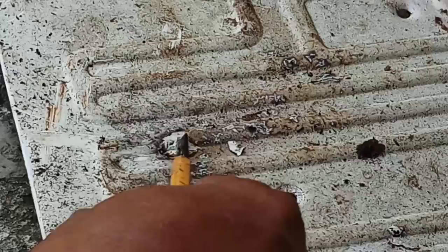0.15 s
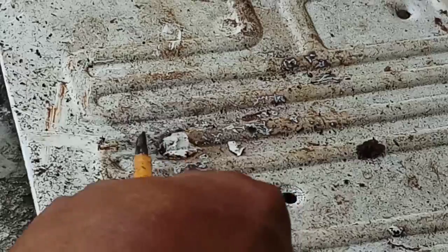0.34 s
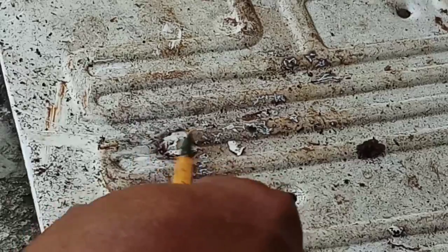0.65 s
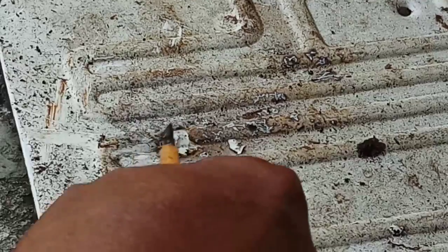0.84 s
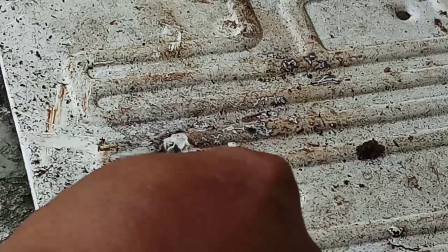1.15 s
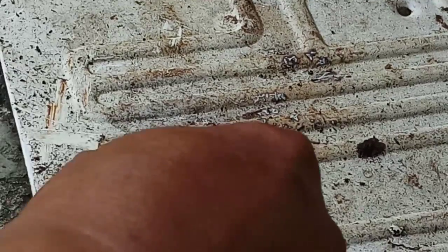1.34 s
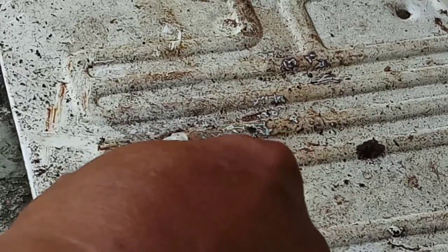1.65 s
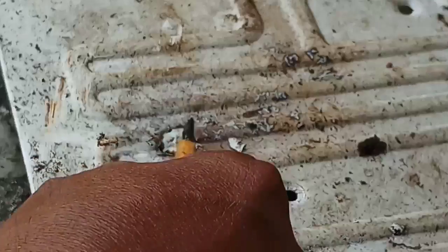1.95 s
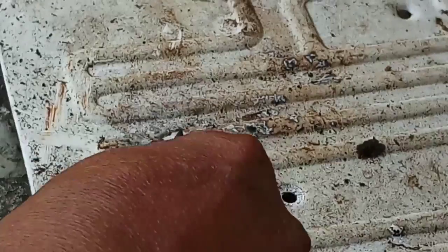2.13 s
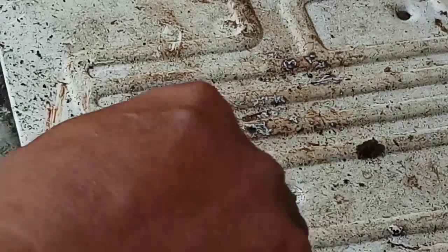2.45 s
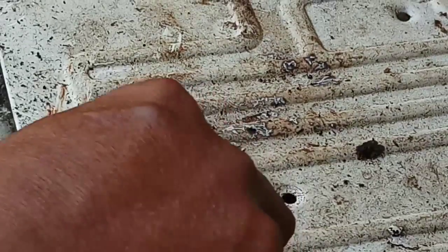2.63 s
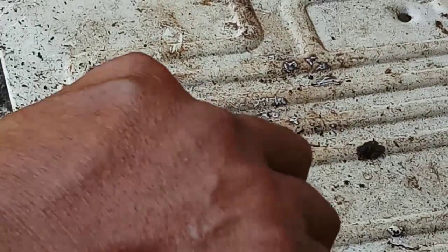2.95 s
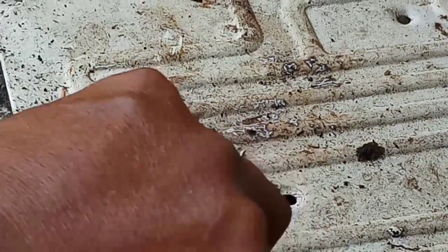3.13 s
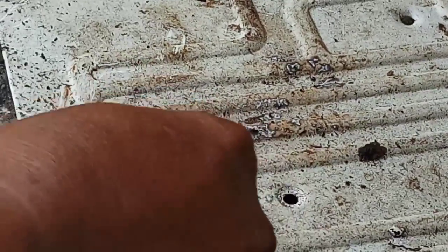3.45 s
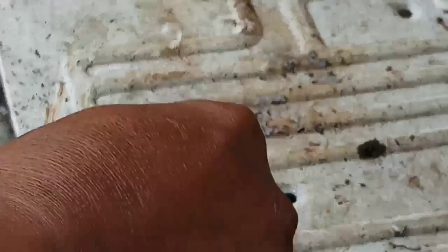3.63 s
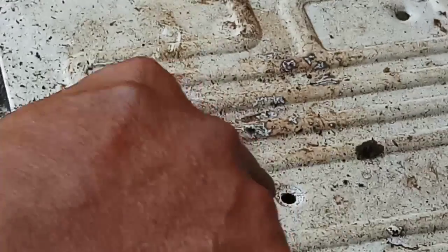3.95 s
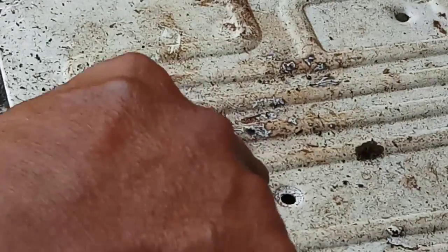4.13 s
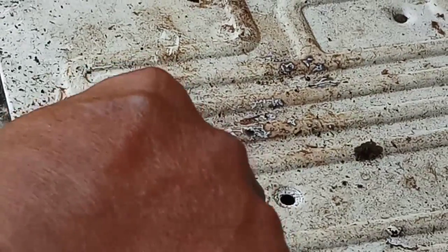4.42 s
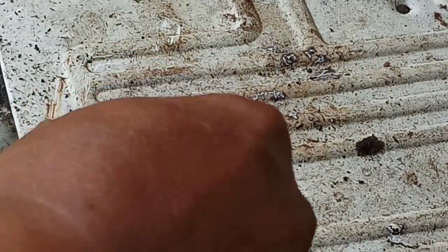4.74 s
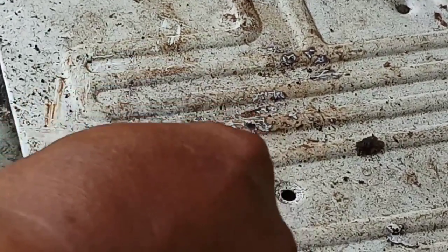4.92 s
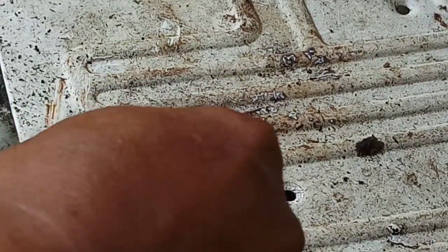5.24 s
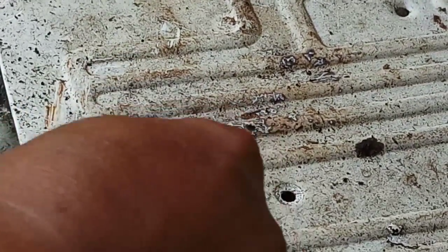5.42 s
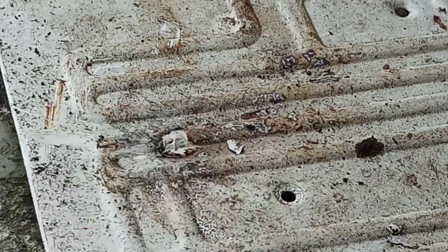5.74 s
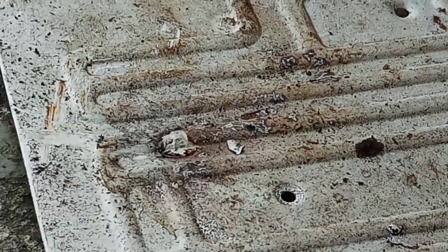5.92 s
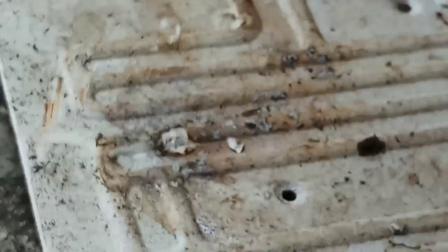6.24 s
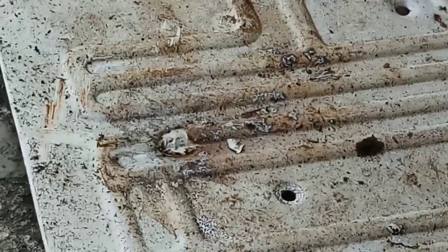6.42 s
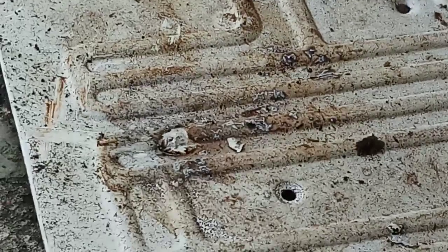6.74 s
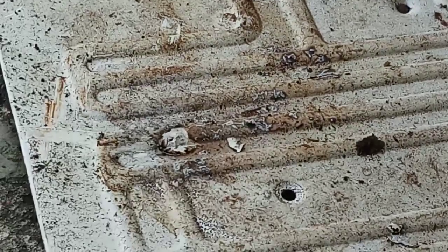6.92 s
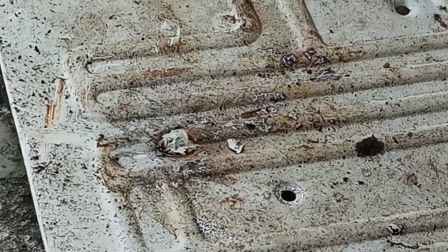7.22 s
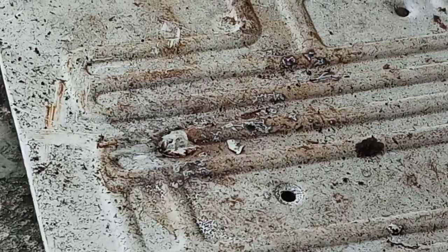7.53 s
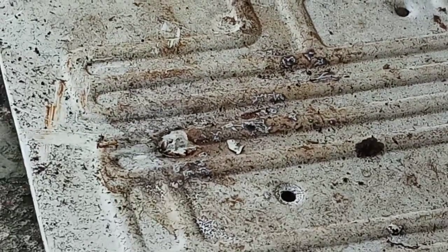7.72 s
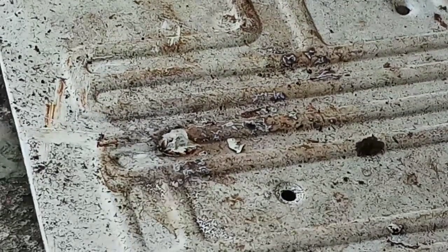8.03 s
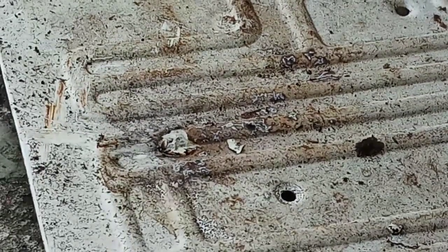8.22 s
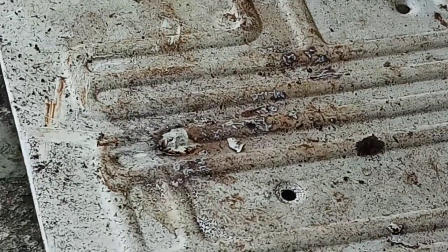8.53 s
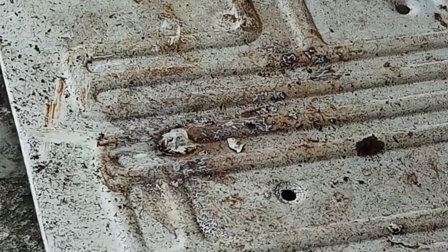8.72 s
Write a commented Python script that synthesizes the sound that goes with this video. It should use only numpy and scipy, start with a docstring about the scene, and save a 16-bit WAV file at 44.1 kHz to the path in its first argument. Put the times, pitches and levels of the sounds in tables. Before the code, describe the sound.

Crickets trill steadily at one pitch outdoors while a tool faintly ticks and scratches on a painted metal panel.

```python
"""From the start, crickets in a yard rub their wings, and echoes blur the trills into one note near 2.3 kHz.
Thin insects sing far off, over a low outdoor rumble, mains hum and a faint electrical buzz.
Close by, an arm rustles on and off, and for the first three seconds a tool ticks on a painted metal panel.
After four seconds a far insect chirps twice, with a high rasp. Then the tool scratches faintly
at the paint until about 7.5 s, with one dull knock near 5 s, and the crickets sing on to the end."""
import sys
import numpy as np
from scipy import signal
from scipy.fft import rfft, irfft, next_fast_len
from scipy.io import wavfile

SR = 44100
rng = np.random.default_rng(int(sys.argv[2]) if len(sys.argv) > 2 else 0)


def file_out(sig):
    """Save sig as 16-bit WAV at sys.argv[1]."""
    # one column per channel
    cols = np.atleast_2d(sig).T
    # limit, then scale
    lim = np.clip(cols, -1, 1)
    pcm = np.round(lim * 32767).astype(np.int16)
    wavfile.write(sys.argv[1], SR, pcm)


N = 391166
T = np.arange(N) / SR


def undb(db):
    """Turn decibels into a number to multiply by."""
    return 10 ** (np.asarray(db) / 20)


def level(x, db):
    """Set a sound's average (rms) level."""
    return x * undb(db) / np.sqrt(np.mean(x ** 2))


def colour(x, points):
    """Turn lows and highs up or down along a curve of (pitch [Hz], gain [dB]) points."""
    hz, db = np.transpose(points)
    bins = np.fft.rfftfreq(len(x), 1 / SR)
    gain = undb(np.interp(np.log(bins + 1), np.log(hz), db))
    return irfft(rfft(x) * gain, len(x))


def tilted(points, slope, pivot_hz):
    """Make a colour curve brighter by `slope` dB an octave."""
    return [(hz, db + slope * np.log2(hz / pivot_hz)) for hz, db in points]


def band(x, hz, width_hz):
    """Keep only the sound near one pitch."""
    edges = np.clip([hz - width_hz / 2, hz + width_hz / 2], 10, SR / 2 - 10)
    return signal.sosfilt(signal.butter(N=2, Wn=edges, btype="band", fs=SR, output="sos"), x)


def noise():
    """An even hiss: white noise."""
    return rng.standard_normal(N)


def wander(rate):
    """A smooth random curve of size about 1 that turns about `rate` times a second."""
    size = next_fast_len(N, real=True)
    hz = np.fft.rfftfreq(size, 1 / SR)
    slow_part = rfft(noise(), size) * np.exp(-(hz / rate) ** 2)
    return level(irfft(slow_part, size)[:N], 0)


def arch(u):
    """Rise and fall once while u runs from 0 to 1; silent outside."""
    return np.sin(np.pi * np.clip(u, 0, 1))


def add(track, start, sound):
    """Mix a short sound into the track, `start` seconds in."""
    place = track[max(int(start * SR), 0):][:len(sound)]
    place += sound[:len(place)]


def yard(x, fade_s, echo_db):
    """Walls and plants send back a dense echo that falls 60 dB in `fade_s`."""
    tail = noise()[:SR] * undb(-60 * T[:SR] / fade_s)
    return x + undb(echo_db) * signal.fftconvolve(x, tail / np.linalg.norm(tail))[:N]


# the colour of outdoor air: (pitch [Hz], gain [dB])
AIR_COLOUR = [(20, -5.5), (40, -0.5), (110, 1.5), (200, -3.5), (400, -9.5), (600, -14), (950, -15.5),
              (1300, -20.5), (2000, -11.5), (3400, -12), (4800, -14), (6000, -20), (7800, -23),
              (15500, -28)]

def air(air_db=-62.5):
    """Outdoor hiss and rumble, with a low murmur that swells slowly like far traffic."""
    murmur = level(band(noise(), hz=349, width_hz=215), db=-82) * undb(2 * wander(1.5))
    rumble = level(colour(noise(), AIR_COLOUR), air_db) * undb(.33 * wander(3.4))
    return rumble + murmur


def electrics(hum_db=-72, buzz_db=-74, repeats_per_s=22.693):
    """Mains hum, and a buzz made of three short pips that repeat quickly."""
    slot = (repeats_per_s * T - .235) % 1 * 12
    pips = (slot < 3) * arch(slot % 1) ** 2  # only 3 of the 12 time slots sound
    whine_phase = 2 * np.pi * np.cumsum(3630 + 45 * wander(144)) / SR
    harmonics_db = [6, -5, -4.5, -4]
    whine = sum(undb(db) * np.sin(k * whine_phase) for k, db in enumerate(harmonics_db, 1))
    hum = np.sin(2 * np.pi * 49.4 * T + .5 * wander(3.5))
    return level(pips * whine, buzz_db) + level(hum, hum_db)


# far insect songs: (pitch [Hz], width [Hz], level [dB], throb rate [per s], throb depth [0-1])
FAR_SONGS = [(4494, 57, -77.5, 4.0, 0.17), (6920, 460, -77.5, 1.0, 0), (8820, 460, -79, 2.6, 0.03)]

def far_insects():
    """Thin songs, smeared by distance into narrow bands of hiss; some throb."""
    out = 0
    for hz, width, db, rate, depth in FAR_SONGS:
        throb = 1 + depth * np.sin(2 * np.pi * rate * T + .5 * wander(1))
        out += level(band(noise(), hz, width) * throb, db)
    return out


# how loud the pulsing insect is as time passes: (time [s], level [dB])
PULSING_LEVELS = [(0, -77.5), (3.3, -76.5), (3.8, -90), (6.4, -93), (7.6, -81.5), (8.87, -83)]

def pulsing_insect(pulses_per_s=6.7):
    """One very high insect pulses, fades away and comes back."""
    pulses = arch((pulses_per_s * T - .25) % 1)
    song = level(band(noise(), hz=8430, width_hz=230) * pulses, 0)
    return song * undb(np.interp(T, *np.transpose(PULSING_LEVELS)))


# two chirps: (middle time [s], level [dB])
CHIRP_PEAKS = [(4.29, -62.3), (4.522, -61.4)]

def chirping_insect(length_s=.155):
    """A far insect chirps twice, and each chirp trails off in the yard."""
    swell = sum(undb(db) * arch((T - middle) / length_s + .5) for middle, db in CHIRP_PEAKS)
    chirps = swell * level(band(noise(), hz=4915, width_hz=510), 0)
    return yard(chirps, fade_s=.5, echo_db=-1.5)


# the two strokes of a rasp: (time [s], level [dB])
RASP_STROKES = [(4.435, -64), (4.482, -58.5)]
# the colour of the rasp: (pitch [Hz], gain [dB])
RASP_COLOUR = [(7000, -35), (7800, -10), (9500, -11), (10400, 0), (11000, -9), (12000, -30)]

def rasp(length_s=.048):
    """A dry, thin double rasp overlaps the second chirp."""
    strokes = sum(undb(db) * arch((T - start) / length_s) for start, db in RASP_STROKES)
    return strokes * level(colour(noise(), RASP_COLOUR), 0)


# strokes of skin over paint: (time [s], length [s], level [dB])
SKIN_STROKES = [(2.36, .22, -71.5), (2.66, .15, -72.5), (6.78, 1, -71.5)]

def skin_swishes():
    """Skin brushes the paint with a soft, high hiss."""
    strokes = sum(undb(db) * arch((T - start) / length) for start, length, db in SKIN_STROKES)
    return strokes * level(band(noise(), hz=5200, width_hz=3600), 0)


# sweeps of the hand and arm: (time [s], length [s], level [dB])
ARM_SWEEPS = [(.37, .47, -60.5), (.72, .52, -63.5), (2.88, .34, -67), (3.67, .4, -65.3), (5.279, .25, -63),
              (5.597, .3, -66.5), (6.32, .22, -64.5)]
# the colour of a rustle: (pitch [Hz], gain [dB])
RUSTLE_COLOUR = [(30, -5), (70, -4), (150, 2.5), (260, -2.5), (390, 1.5), (600, -6), (1000, -8.5),
                 (1500, -21), (3000, -13), (6000, -14.5), (9000, -28), (15000, -42)]

def arm_rustles(plain_db=-61, brightening=.38):
    """The arm rustles over the panel; a brisker sweep is brighter as well as louder."""
    out = np.zeros(N)
    for start, length, db in ARM_SWEEPS:
        slope = brightening * (db - plain_db)
        rub = colour(rng.standard_normal(SR), tilted(RUSTLE_COLOUR, slope, pivot_hz=1000))
        add(out, start, level(rub, db) * arch(T[:SR] / length))
    return out


# soft bumps: (time [s], pitch [Hz], level [dB])
HAND_BUMPS = [(.59, 54.4, -51), (.615, 150, -55), (.832, 70, -51), (4.238, 125, -50)]

def hand_bumps(length_s=.03):
    """The hand holding the microphone jogs it now and then, making a low thud."""
    out, age = np.zeros(N), T[:SR]
    for start, hz, db in HAND_BUMPS:
        add(out, start, undb(db) * np.sin(2 * np.pi * hz * age) * arch(age / length_s) ** 2)
    return out


# light taps of the tool: (time [s], strength [dB], brightness [dB per octave])
TOOL_TAPS = [(.729, -56, -8), (.863, -55, -6), (.970, -59, 10), (1.332, -58, 10), (2.750, -58, 3),
             (3.173, -48.3, -.5)]
# the colour of a tap: (pitch [Hz], gain [dB])
TAP_COLOUR = [(1000, -20), (3000, -10), (4500, 12), (7000, 3), (9000, 2), (12000, -5), (15500, -11)]

def tool_taps(crack_s=.0015, ring_s=.022, ring_db=-16):
    """The tool tip touches the metal: a short crack and a faint ring that dies quickly."""
    out, age = np.zeros(N), T[:SR]
    strike = np.exp(-age / crack_s) + undb(ring_db) * np.exp(-age / ring_s)
    for start, db, slope in TOOL_TAPS:
        hiss = colour(rng.standard_normal(SR), tilted(TAP_COLOUR, slope, pivot_hz=6400))
        add(out, start, undb(db) * strike * hiss)
    return out


def press(length, bite_s=.004, lift_s=.01):
    """How hard the tip presses in one scratch or knock: it bites, holds and lifts."""
    age = T[:SR]
    return np.minimum(age / bite_s, 1) * np.clip((length - age) / lift_s + .5, 0, 1)


# scratches and one short, dull knock (at 5.029 s) of the tool on the panel:
# (time [s], length [s], strength [dB], brightness [dB per octave])
SCRATCHES_AND_KNOCK = [(.104, .03, -63.5, 5), (4.487, .03, -62, 5), (4.625, .06, -62.5, .5),
                       (4.758, .055, -60, 1), (4.975, .019, -60.5, 4), (5.029, .009, -68.5, -9),
                       (5.456, .041, -54, .5), (6.07, .032, -62, -1), (6.70, .05, -65.5, 4),
                       (7.228, .12, -67.5, -3), (7.477, .011, -57, -1.5)]
# the notes the panel rings at: (pitch [Hz], width [Hz], gain [dB])
PANEL_NOTES = [(630, 370, -4.5), (1074, 210, -1), (1460, 240, -1), (3050, 520, 3.5), (3430, 440, 1.5),
               (4300, 450, -2), (7000, 3200, -4.5)]

def scratches_and_knock(catches_per_s=4000, uneven_db=5, slips_per_s=140, slip_db=2.5):
    """The tip catches on the paint or knocks, ringing the panel; a sharper edge sounds brighter."""
    catches = noise() * (rng.random(N) < catches_per_s / SR)
    grip = undb(uneven_db * noise() + slip_db * wander(slips_per_s))  # the tip sticks and slips
    grit = level(catches * grip, 0)
    panel = 0
    for hz, width, note_db in PANEL_NOTES:
        pressure = np.zeros(N)
        for start, length, db, slope in SCRATCHES_AND_KNOCK:
            add(pressure, start, undb(db + slope * np.log2(hz / 2500)) * press(length))
        ring = band(grit * pressure + 1e-18, hz, width)
        panel += undb(note_db) * ring * np.sqrt(SR / 10 / width)  # evens out wide and narrow notes
    return yard(panel, fade_s=.15, echo_db=-9)


def trill(hz, rate, roughness, duty=.892, sag_hz=60, waver_hz=4, uneven_db=.66, unsteady=.065):
    """One cricket: each closing wing stroke rings a tiny note whose pitch sags as the wing slows."""
    strokes = rate * T + rng.random() + unsteady * wander(9)
    progress = strokes % 1 / duty  # duty is the share of each stroke that sounds
    loudness_luck, phase_luck = rng.standard_normal((4096, 2))[strokes.astype(int)].T
    wing_phase = 2 * np.pi * np.cumsum(hz + waver_hz * wander(6.003)) / SR
    sag = np.pi * sag_hz * duty / rate * progress * (1 - progress)
    loudness = arch(progress) ** 1.21 * undb(uneven_db * loudness_luck)
    return loudness * np.sin(wing_phase + sag + roughness * phase_luck)


# the trilling crickets: (wing pitch [Hz], stroke rate [per s])
CRICKET_WINGS = [(2320.6, 76.4), (2264, 56.1), (2398, 47.3), (2356, 84.2), (2200, 39.4), (2500, 66),
                 (2550, 58), (2055, 62), (1990, 56), (1900, 44), (2620, 62)]

def crickets(core_hz=2320, core_db=-50.3, faintest_db=-70.8, echo_s=.63):
    """The chorus, blurred by echoes; singers away from the core pitch are fainter and rougher."""
    # one singer buzzes through the rest with short, very even strokes
    buzzer = trill(hz=2297, rate=126.15, roughness=.3, duty=.97, waver_hz=6, unsteady=.03)
    out = level(yard(buzzer, echo_s, echo_db=-1), db=-51.8)
    for hz, rate in CRICKET_WINGS:
        off_hz = abs(hz - core_hz)
        drop_db_per_hz = .07 if hz < core_hz else .058
        db = max(core_db - drop_db_per_hz * off_hz, faintest_db)
        roughness = np.interp(off_hz, [0, 45], [.4, 1])
        out += level(yard(trill(hz, rate, roughness), echo_s, echo_db=2), db)
    return out


def scene():
    """Everything, heard by one microphone."""
    songs = crickets() + far_insects() + pulsing_insect() + chirping_insect() + rasp()
    work = tool_taps() + scratches_and_knock() + skin_swishes() + arm_rustles() + hand_bumps()
    return (songs + work + air() + electrics())[None]


def record(dry, top_hz=15500):
    """Cut away the very highest treble."""
    return signal.sosfilt(signal.ellip(10, .1, 70, top_hz, fs=SR, output="sos"), dry)


dry = scene()
out = record(dry)
file_out(out)
```